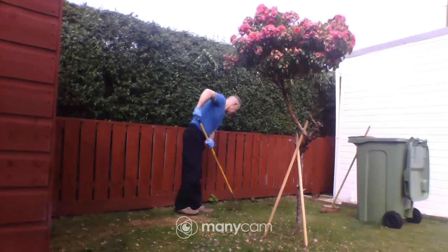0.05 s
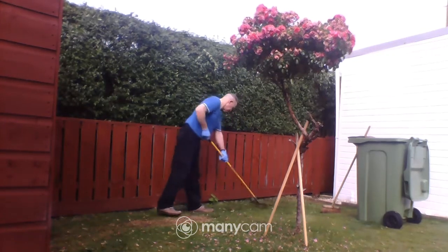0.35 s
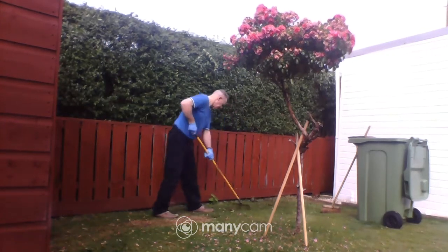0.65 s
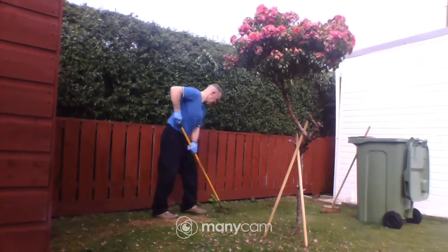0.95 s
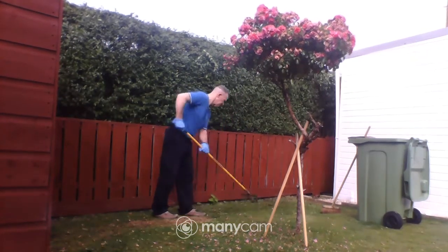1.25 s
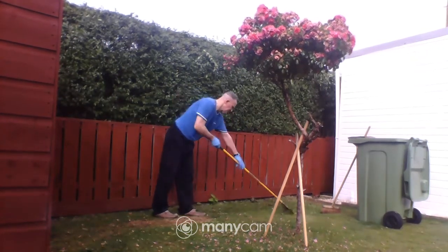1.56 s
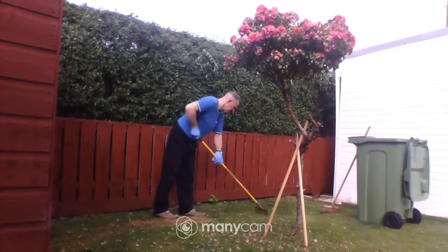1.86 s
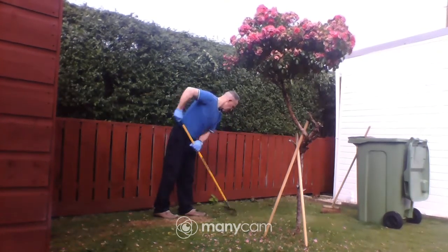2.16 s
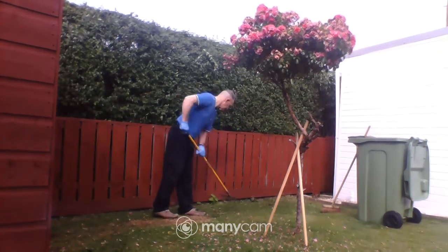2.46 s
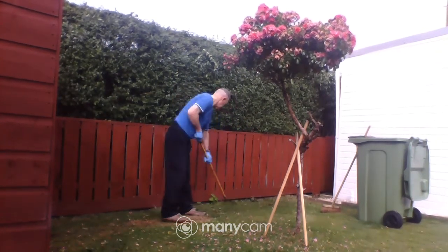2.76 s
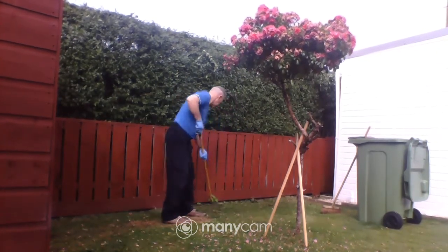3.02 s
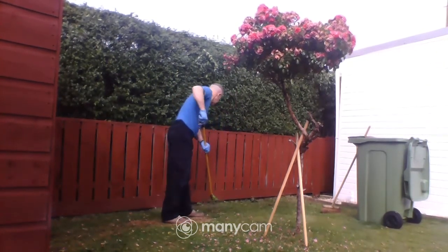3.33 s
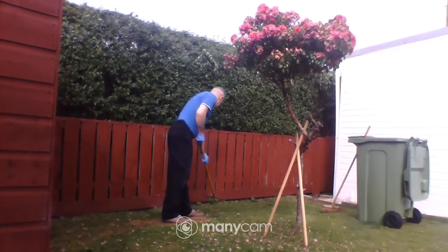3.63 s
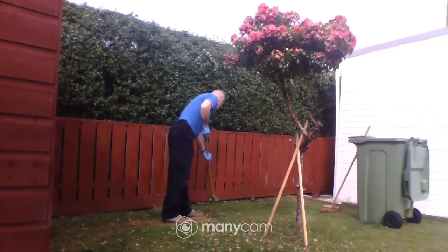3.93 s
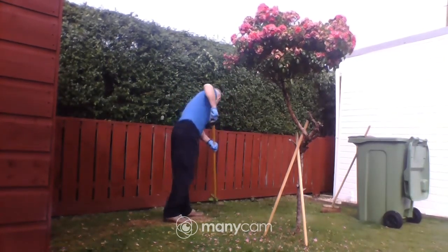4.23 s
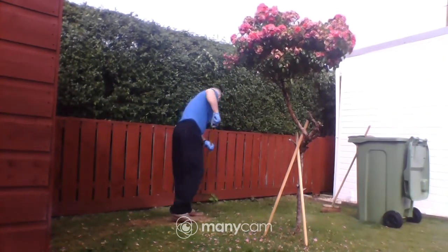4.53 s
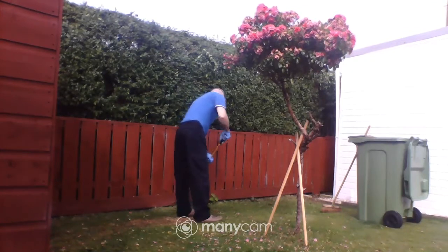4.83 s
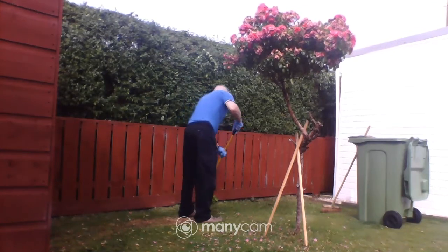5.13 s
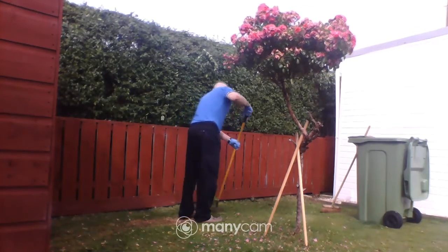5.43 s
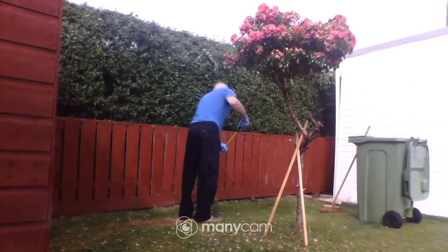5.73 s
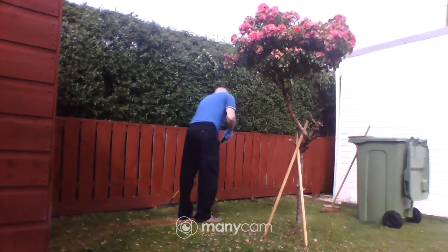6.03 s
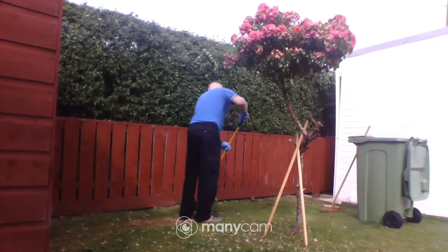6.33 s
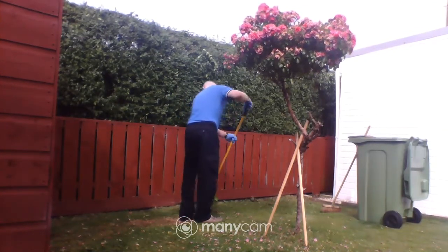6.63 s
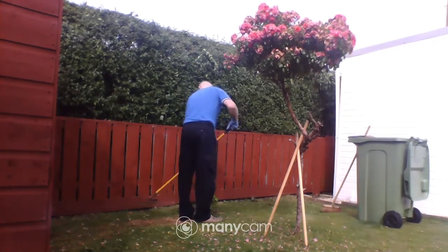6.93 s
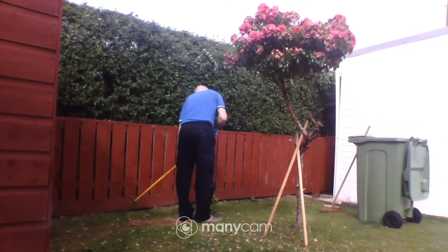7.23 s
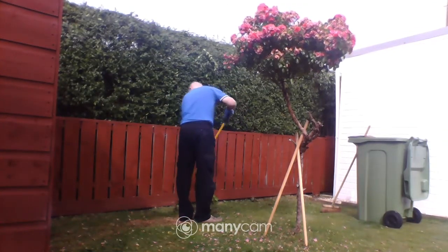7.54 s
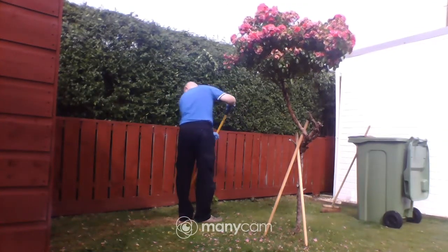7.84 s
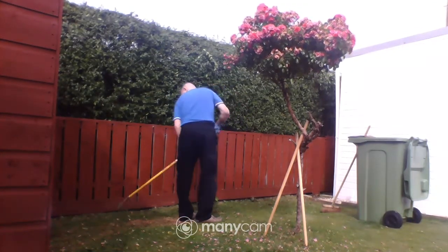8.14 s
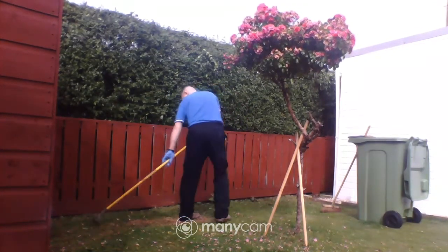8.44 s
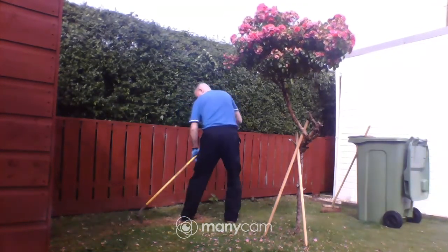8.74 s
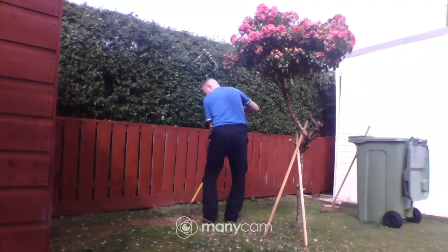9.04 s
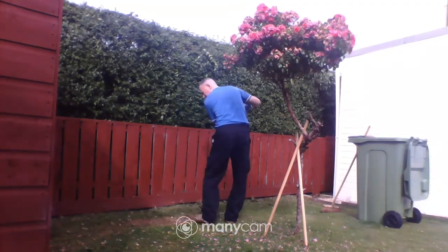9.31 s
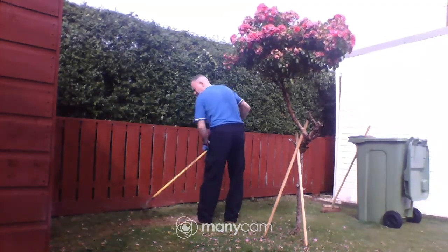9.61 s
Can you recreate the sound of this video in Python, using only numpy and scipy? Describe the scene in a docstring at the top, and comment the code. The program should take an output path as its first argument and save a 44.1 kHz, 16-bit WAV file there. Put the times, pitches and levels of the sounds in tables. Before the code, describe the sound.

Someone rakes a lawn a few metres from the microphone in a small fenced garden. Two dull thuds on the turf open the scene. From about 0.5 seconds, strokes come roughly once a second, near 1, 2, 3, 4 and 5 seconds. Each is a bright, scratchy rustle of grass that stutters as the springy tines catch, slip and ring. Tines snap free with small clinks, loudest just before 4 seconds. At 6 seconds the rake head knocks once on hollow wood. Shorter strokes follow around 6.3 and 7.5 seconds, with soft thuds of rake and feet scattered among the strokes. A last long pull starts near 8.5 seconds and ends on a thud just after 9. Throughout, a light breeze rumbles on the microphone over a dull wash of distant traffic, with faint hiss and a thin electrical whine.

```python
"""A small fenced garden: distant traffic, a light breeze on the microphone, its own hiss and whine.
Two dull thuds on the turf, and a man is raking the lawn a few metres away. In each stroke the springy
tines drag, catch and slip about nine to fifteen times a second, rustling the grass and ringing.
Tines snap free, clinking loudest near 4 s; at 6 s the rake head knocks once on wood.
More strokes follow among thuds of rake and feet, and the last long pull ends on a thud just after 9 s."""
import sys
import numpy as np
from scipy import signal
from scipy.io import wavfile

SR = 44100
rng = np.random.default_rng(int(sys.argv[2]) if len(sys.argv) > 2 else 0)


def master(y):
    """Save y as 16-bit WAV."""
    cut = np.clip(np.atleast_2d(y).T, -1, 1)
    pcm = np.round(cut * 32767)  # scale
    wavfile.write(sys.argv[1], SR, pcm.astype(np.int16))


N = 430857
TIME = np.arange(N) / SR
EDGE_HZ = 15800

# Pulls through the grass. Each row: firmest moment in seconds, seconds of pull before it and after it,
# level in dB, slips per second, dip between slips in dB, low scrape against the rustle in dB.
RAKE_STROKES = [(.912, 0.35, 0.11, -49.5, 12, 5.5, -12.5), (1.958, .16, 0.22, -46.5, 11.1, 11, -13.5),
                (3.035, 0.22, 0.16, -49, 11.3, 10.5, -14), (4.068, 0.21, 0.22, -53.5, 15.2, 8.5, -15),
                (5.14, .14, 0.14, -50.5, 11.4, 5.5, -13.5), (5.366, 0.041, .13, -49, 9.7, 9.5, -12.5),
                (6.232, 0.15, 0.1, -50.5, 9.3, 6, -11.5), (6.466, 0.09, .045, -52, 10.5, 4.5, -9.5),
                (7.457, .14, 0.21, -52.5, 8.6, 9, -16.5), (8.975, .44, 0.25, -50, 11.2, 5.5, -16.5)]
# Tines striking or springing free. Each row: start in seconds, grass swish in dB, tine clink in dB,
# head clack in dB, t60 of swish and clack in seconds.
TINE_SNAPS = [(0.487, -53, -54.5, -66, 0.08), (0.707, -48, -47, -44.5, .045), (0.982, -44, -53, -57, 0.05),
              (1.796, -59, -44.5, -57, 0.098), (1.951, -48, -42.5, -77, 0.22),
              (2.694, -71, -70, -61, 0.055), (3.004, -44, -48, -70, 0.063), (3.21, -44.5, -50, -63, 0.067),
              (3.759, -62, -60, -55, 0.082), (3.852, -66, -49, -62, 0.074), (3.9, -53, -34, -52, 0.089),
              (3.907, -57, -37.5, -54, 0.12), (4.08, -54, -47.5, -61, 0.079),
              (5.044, -56, -41.5, -71, 0.071), (5.123, -48.5, -50, -68, 0.17),
              (5.529, -46, -56, -78, 0.032), (5.989, -47, -41.5, -44.5, 0.062), (6.15, -45, -53, -61, .045),
              (7.435, -40, -54, -64, 0.1), (7.558, -45, -58, -62, 0.15), (8.307, -62, -66, -59.5, 0.07)]


def pull(s, before, after, db, slips_per_s, dip_db, ease_db=4.5, bite_db_per_s=193, lift_db_per_s=227):
    """Force of one stroke: the tines bite, catch and slip at a steady rate around time s, and lift out."""
    t = TIME - s
    ease = ease_db * np.minimum(np.maximum(-t / before, t / after), 1) ** 2  # lighter at both ends
    ends = bite_db_per_s * np.maximum(-t - before, 0) + lift_db_per_s * np.maximum(t - after, 0)
    caught = dip_db * abs(np.sin(np.pi * slips_per_s * t)) ** 1.12  # the power sets the length of a skid
    return gain_of(db - ease - ends - caught)


def rubbing(slip_spread_db=2.05, tuft_db=1, graze_db=-72):
    """Strength of the friction: firm pulls through uneven tufts, light brushes and a faint graze between."""
    # The rake brushes the lawn as it is carried forward.
    # Each row: centre in seconds, level in dB, half length in seconds.
    light_brushes = [(0, -61.5, 0.045), (1.522, -63, 0.042), (1.69, -61.5, .045), (2.53, -61, 0.013),
                     (2.693, -65.5, .11), (3.782, -57, .011), (4.79, -67, .04), (4.857, -58.5, 0.013),
                     (7.242, -60, .01), (8.08, -69, 0.055), (8.35, -58, 0.084), (9.484, -69, .04)]
    uneven = gain_of(slip_spread_db * wander(per_s=18) + tuft_db * wander(per_s=77))
    pulls = sum(pull(*row[:-1]) ** 2 for row in RAKE_STROKES) * uneven ** 2
    brushes = sum(gain_of(db) ** 2 * np.exp(-((TIME - s) / half) ** 2) for s, db, half in light_brushes)
    return np.sqrt(pulls + brushes + gain_of(graze_db) ** 2)


def grass(rub, rustle_db=-3, crack_db=2, bend_db=-58):
    """A light touch only brushes the tips; a firm one bends whole blades, and a blow starts with a crack."""
    # Tone of bent blades and of brushed tips. Each row: frequency in Hz, spectral level in dB.
    blade_tone = [(300, -19), (1200, -24), (2400, -18.5), (3600, -11.5), (5400, -11), (6500, -1),
                  (7800, 4.5), (8700, 10.5), (9700, 3.5), (10700, -0.5), (11800, -6.5), (13200, -8),
                  (15800, -20)]
    tip_tone = [(300, -53), (4000, -27.5), (7000, -11.5), (8300, -8), (9300, -1.5), (10300, -10.5),
                (12000, -18.5), (15800, -18.5)]
    swish = sum(gain_of(db) * blow(s, t60, rise=0.0018) for s, db, _, _, t60 in TINE_SNAPS)
    crack = sum(gain_of(db + crack_db) * blow(s + 0.0026, t60=0.007, rise=0.0005)
                for s, db, *_ in TINE_SNAPS)
    force = np.sqrt((gain_of(rustle_db) * rub) ** 2 + swish ** 2 + crack ** 2)
    firmness = force ** 2 / (force ** 2 + gain_of(bend_db) ** 2)
    texture = 0.64 * contacts(per_s=4500, spread_db=2.0) + 0.63 * blade_ticks()
    rustle = force * texture
    blades = through(rustle * np.sqrt(firmness), colour(blade_tone))
    tips = through(rustle * np.sqrt(1 - firmness), colour(tip_tone))
    return blades + tips


def blade_ticks(per_s=3200, width_hz=150, spread_db=2, size=400):
    """Single blades and leaves flick off the tines, each with a brief pitch of its own; rms 1."""
    when, pitch, chance, damping = rng.random((int(per_s * N / SR), 4)).T[:, :, None]
    t = np.arange(size) / SR
    height = gain_of(spread_db * np.minimum(-np.log(1 - chance), 3))
    decay = np.exp(-np.pi * width_hz * (.5 + damping) * t)
    ticks = height * decay * np.sin(2 * np.pi * pitch * EDGE_HZ * t)
    at = (when * N).astype(int) + np.arange(size)
    return unit_rms(np.bincount(at.ravel(), ticks.ravel(), N)[:N])


def tines(rub, scrape_db=-5, load_shift_db=4.5, free_damping=0.63):
    """The load shifts from tine to tine, so modes come and go; struck tines spring free and ring longer."""
    # Bright ring of the tines. Each row: frequency in Hz, bandwidth in Hz, relative level in dB.
    tine_modes = [(2105, 48, -25), (2540, 42, -28), (3064, 48, -13), (3100, 69, -22), (3370, 54, -13),
                  (3615, 37, -18.5), (3880, 85, -10), (4800, 92, -19), (4850, 68, -12.5), (5710, 110, -9),
                  (6380, 130, -9), (6930, 120, -3.5), (7100, 71, -6.5), (7550, 48, -4), (8190, 75, -0.5),
                  (8500, 48, -7), (8710, 70, 4.5), (9030, 64, 2), (9500, 150, -7), (9760, 80, -2.5),
                  (10630, 90, -19), (11800, 100, -21), (12470, 100, -19), (12800, 100, -4),
                  (15300, 110, -26)]
    scrape = gain_of(scrape_db) * rub * contacts(per_s=2500, spread_db=4.5)
    rubbed = np.zeros(N)
    for ring in mode_rings(tine_modes):
        load = unit_rms(gain_of(load_shift_db * wander(per_s=28)))
        rubbed += through(scrape * load, ring)
    clinks = [(s, db, 0.71 * t60) for s, _, db, _, t60 in TINE_SNAPS]
    strike = impacts(clinks, rise=0.0041, first_s=0.0012)
    return rubbed + through(strike, mode_rings(tine_modes, free_damping).sum(0))


def rake_head(rub, clack_db=-1):
    """The head carries the low part of the scrape and clacks at each blow."""
    # Body of the head. Each row: frequency in Hz, bandwidth in Hz, relative level in dB.
    head_modes = [(1490, 110, -13), (1860, 210, -8), (2510, 310, 7.5), (2830, 160, -1), (3160, 176, 7.5),
                  (4070, 190, -2.5), (4530, 700, -1.5), (6430, 320, -11)]
    blows = [(s, db + clack_db, t60) for s, _, _, db, t60 in TINE_SNAPS]
    clack = impacts(blows, rise=0.00085, first_s=0.0014)
    dig = level([(s, dig_db) for s, *_, dig_db in RAKE_STROKES])
    scrape = rub * dig * contacts(per_s=2500, spread_db=4.0)
    return through(clack + scrape, mode_rings(head_modes).sum(0))


def wood_knock(bump_db=-6):
    """The rake head rattles briefly against hollow wood, with a dull bump of the boards."""
    # The hit. Each row: start in seconds, level in dB, t60 in seconds.
    hits = [(6.004, -46, 0.15)]
    # Hollow ring of the wood. Each row: frequency in Hz, bandwidth in Hz, relative level in dB.
    wood_modes = [(287, 160, 0.5), (556, 210, -9), (867, 180, 2), (1220, 210, -3), (1650, 410, -13),
                  (2420, 150, -3), (4320, 850, -11)]
    # Tone of the bump. Each row: frequency in Hz, spectral level in dB.
    board_tone = [(60, -12), (250, 8), (600, -2), (1000, -2), (2000, -11), (5000, -28)]
    force = impacts(hits, rise=0.00046, first_s=0.0035)
    ring = through(force, mode_rings(wood_modes).sum(0))
    return ring + gain_of(bump_db) * through(force, colour(board_tone))


def thuds(turf_db=-1, puff_db=-12.5):
    """Soft turf gives a few low cycles that swell fast and die, with a muffled puff of soil."""
    # Rake and feet landing. Each row: start in seconds, level in dB, pitch in Hz, length in seconds.
    landings = [(0.038, -36, 49.5, 0.085), (0.199, -36.5, 55, 0.079), (2.025, -33, 120, .036),
                (2.343, -38.5, 55, 0.058), (2.945, -39.5, 129, 0.066), (2.98, -34.5, 57.7, 0.074),
                (3.215, -29.5, 123, 0.032), (3.364, -43, 110, 0.047), (4.764, -46, 129, 0.044),
                (5.079, -36, 60, 0.043), (5.368, -33.5, 84, 0.056), (5.935, -35.5, 89, .032),
                (6.49, -40, 101, 0.051), (6.715, -33, 78, 0.031), (9.114, -33.5, 60, 0.035),
                (9.205, -25.5, 87, 0.021)]
    # Tone of the puff. Each row: frequency in Hz, spectral level in dB.
    soil_tone = [(20, -8), (90, 1.5), (170, -4), (260, -9.5), (380, -24), (800, -24), (3000, -70)]
    thump, pressure = np.zeros(N), np.zeros(N)
    for s, db, hz, length in landings:
        t = np.arange(0, 2 * length, 1 / SR)
        swell = t / (0.29 * length)  # 1 at the peak
        weight = gain_of(db) * (swell * np.exp(1 - swell)) ** 3
        add(thump, s, weight * np.sin(2 * np.pi * (hz * t + rng.random())))
        add(pressure, s, weight)
    return gain_of(turf_db) * thump + gain_of(puff_db) * pressure * noise(soil_tone)


def garden(x, echo_db=-11, t60=0.13, count=40):
    """Fence, wall and bin throw back a handful of early echoes."""
    delay = rng.uniform(.004, .07, count)
    taps = np.zeros(SR // 10)
    taps[(delay * SR).astype(int)] = rng.choice([-1, 1], count) * np.exp(-np.log(1000) * delay / t60)
    return x + gain_of(echo_db) * through(x, taps / np.linalg.norm(taps))


def breeze(trim_db=0.77, flutter_db=1.9):
    """Gusts rumble on the microphone, and the eddies within them flutter."""
    # Rise and fall of the gusts. Each row: time in seconds, level in dB.
    gusts = [(0, -42), (.55, -44.5), (.85, -49), (1.35, -49), (1.9, -44.5), (2.8, -50), (3.28, -42.5),
             (3.65, -49.5), (4.6, -49.5), (5.35, -47), (5.7, -53), (6.05, -42.5), (6.35, -49.5), (6.8, -44),
             (7.4, -50), (7.9, -45.5), (8.7, -50), (9.2, -44), (9.5, -49.5)]
    # Tone of the rumble. Each row: frequency in Hz, spectral level in dB.
    rumble_tone = [(10, -7.5), (25, -0.5), (48, 0), (65, -4.5), (82, -12.5), (105, -11), (150, -19.5),
                   (210, -34), (400, -39.5), (2000, -97)]
    return gain_of(trim_db + flutter_db * wander(per_s=7)) * level(gusts) * noise(rumble_tone)


def traffic(trim_db=1):
    """A distant road lays down a dull, nearly steady wash."""
    # Slow swells of the traffic. Each row: time in seconds, level in dB.
    swells = [(0, -59.5), (1.3, -60), (3.8, -57.5), (5, -59.5), (6, -57.5), (7.2, -58.5), (8.95, -57.5),
              (9.77, -58)]
    # Tone of the wash. Each row: frequency in Hz, spectral level in dB.
    road_tone = [(30, -9.5), (180, 1), (270, 3), (370, -3), (480, -1.5), (600, -3.5), (800, -2), (1000, 0),
                 (1300, -7), (2000, -12), (3000, -25.5), (5000, -45), (15000, -42)]
    return gain_of(trim_db) * level(swells) * noise(road_tone)


def microphone_noise(hiss_db=-67):
    """The microphone's own hiss and thin electrical whine."""
    # Steady tones of the whine. Each row: frequency in Hz, rms level in dB.
    whine_tones = [(3150, -79.5), (4850, -89), (6303, -87.5), (8000, -80.5), (11150, -86), (12603, -94),
                   (12850, -98)]
    # Tone of the hiss. Each row: frequency in Hz, spectral level in dB.
    hiss_tone = [(100, -4.5), (3000, -0.5), (5000, -3.5), (7300, -6), (8300, -3.5), (9200, 3), (10300, -3),
                 (12000, -4.5), (15800, -5.5)]
    whine = sum(gain_of(db) * np.sqrt(2) * np.sin(2 * np.pi * (hz * TIME + rng.random()))
                for hz, db in whine_tones)
    return gain_of(hiss_db) * noise(hiss_tone) + whine


def impacts(blows, rise, first_s, per_s=4000):
    """Each (s, dB, t60) blow is one sharp contact, as strong as first_s of chatter, and a dying chatter."""
    envelope = sum(gain_of(db) * blow(s, t60, rise) for s, db, t60 in blows)
    force = envelope * contacts(per_s, spread_db=6.0)
    for s, db, _ in blows:
        add(force, s + .002, gain_of([db]) * np.sqrt(first_s * SR))
    return force


def blow(s, t60, rise):
    """Envelope of a blow: a quick rise and an exponential fall, all times in seconds."""
    t = np.maximum(TIME - s, 0)
    return np.minimum(t / rise, 1) * np.exp(-np.log(1000) * t / t60)


def contacts(per_s, spread_db):
    """A dense train of tiny clicks of uneven size, rms 1."""
    size = gain_of(spread_db * np.minimum(rng.exponential(1, N), 4)) * rng.choice([-1, 1], N)
    return unit_rms(size * (rng.random(N) < per_s / SR))


def mode_rings(modes, damping=1, size=4096):
    """The ring of each mode after one click; their energies sum to 1."""
    t = np.arange(size) / SR
    rings = np.array([gain_of(db) * width * np.exp(-np.pi * damping * width * t) * np.sin(2 * np.pi * hz * t)
                      for hz, width, db in modes])
    return rings / np.linalg.norm(rings)


def colour(points, size=8192):
    """Minimum-phase impulse response of unit energy with the given (Hz, dB) spectrum."""
    hz, db = np.transpose(points)
    bin_hz = abs(np.fft.fftfreq(size, 1 / SR))
    log_gain = np.log(gain_of(np.interp(np.log(bin_hz + 1), np.log(hz), db)))
    response = np.fft.ifft(np.exp(np.conj(signal.hilbert(log_gain)))).real[:size // 2]
    return response / np.linalg.norm(response)


def noise(points):
    """Steady noise of rms 1 with the given spectrum."""
    return unit_rms(through(rng.standard_normal(N), colour(points)))


def through(x, response):
    """Plays x through an impulse response."""
    return signal.oaconvolve(x, response)[:N]


def wander(per_s):
    """A random curve of spread about 1 that takes per_s turns a second."""
    return np.interp(TIME * per_s, np.arange(1000), rng.standard_normal(1000))


def level(curve):
    """A (s, dB) curve as a gain for every sample."""
    return gain_of(np.interp(TIME, *np.transpose(curve)))


def add(mix, s, sound):
    """Mixes a sound in at time s."""
    part = mix[max(round(s * SR), 0):][:len(sound)]
    part += sound[:len(part)]


def gain_of(db):
    """Decibels to amplitude."""
    return 10 ** (np.asarray(db) / 20)


def unit_rms(x):
    """Scales to rms 1."""
    return x / np.sqrt(np.mean(x ** 2) + 1e-20)


def scene():
    """The raking in its garden, over the background."""
    rub = rubbing()
    rake = grass(rub) + tines(rub) + rake_head(rub) + wood_knock()
    return (garden(rake) + thuds() + breeze() + traffic() + microphone_noise())[None]


def record(dry):
    """A steep low-pass cuts the very top of the treble."""
    lowpass = signal.firwin(511, EDGE_HZ, window=("kaiser", 9), fs=SR)
    return signal.oaconvolve(dry, lowpass[None], "same")


dry = scene()
out = record(dry)
master(out)
```